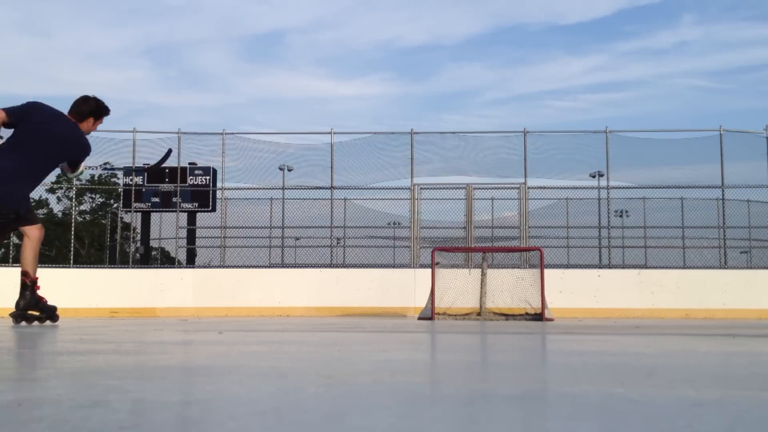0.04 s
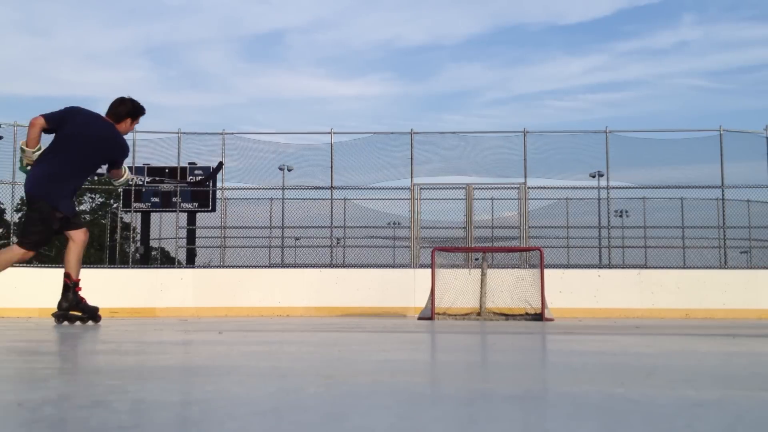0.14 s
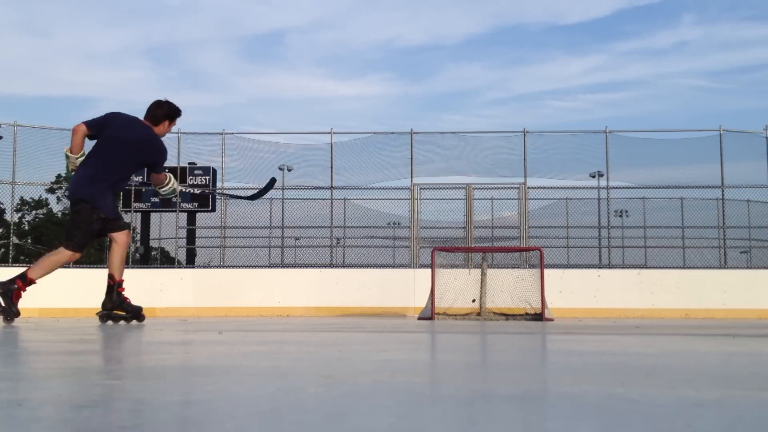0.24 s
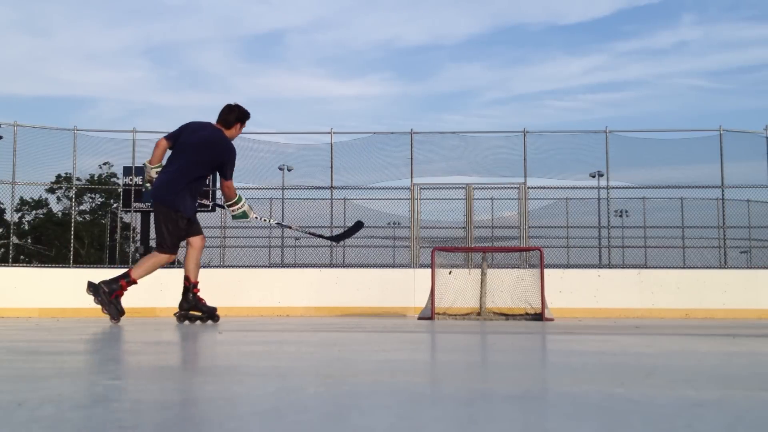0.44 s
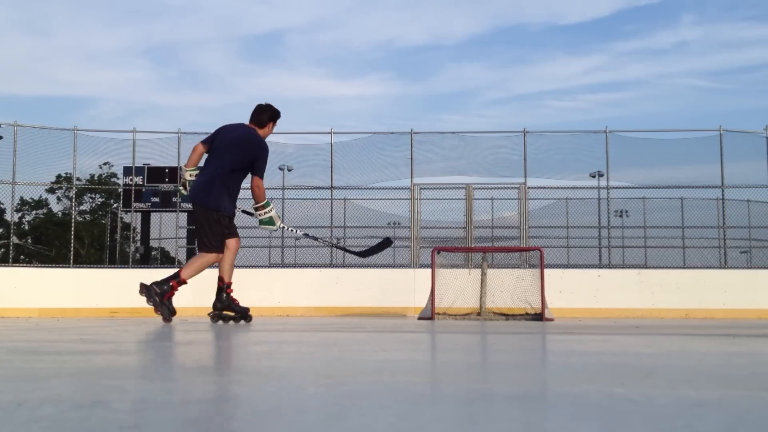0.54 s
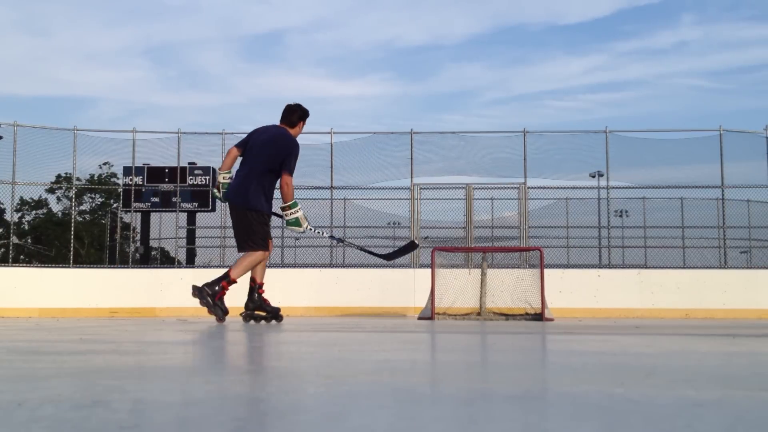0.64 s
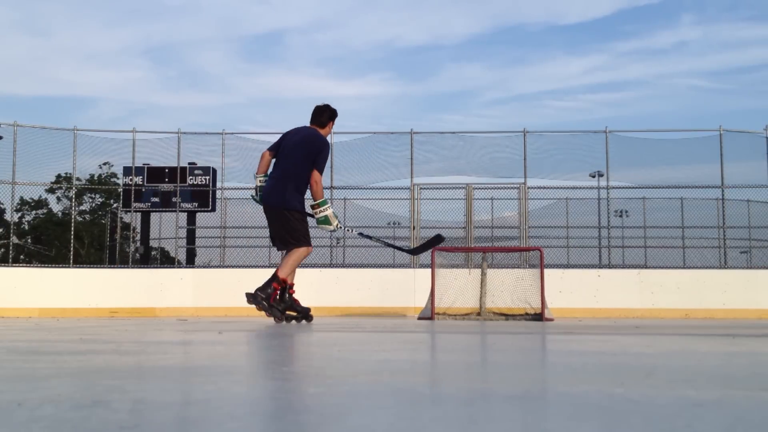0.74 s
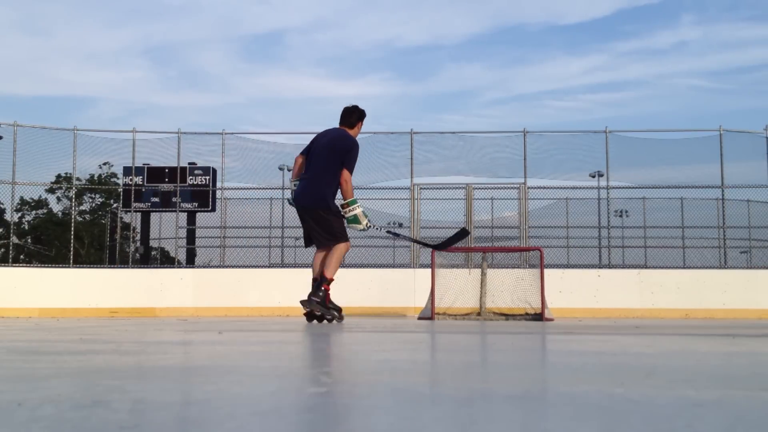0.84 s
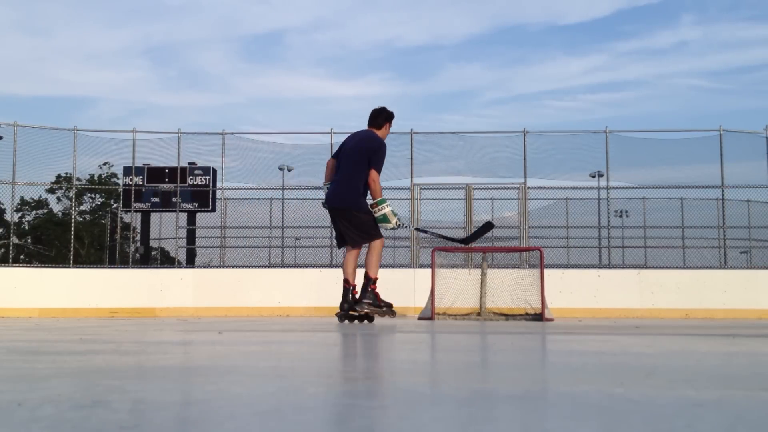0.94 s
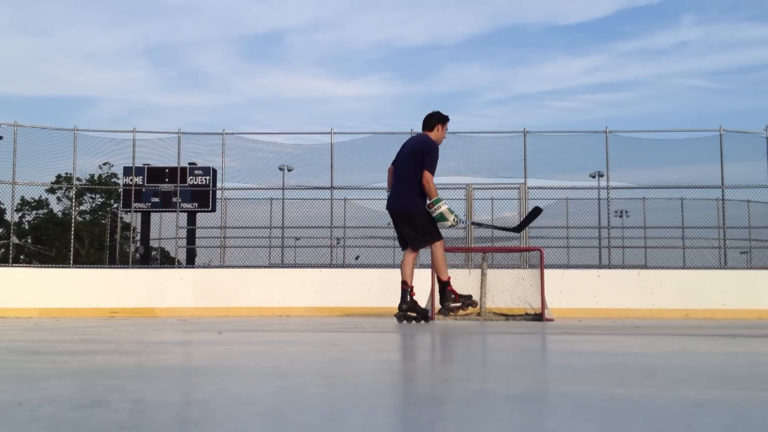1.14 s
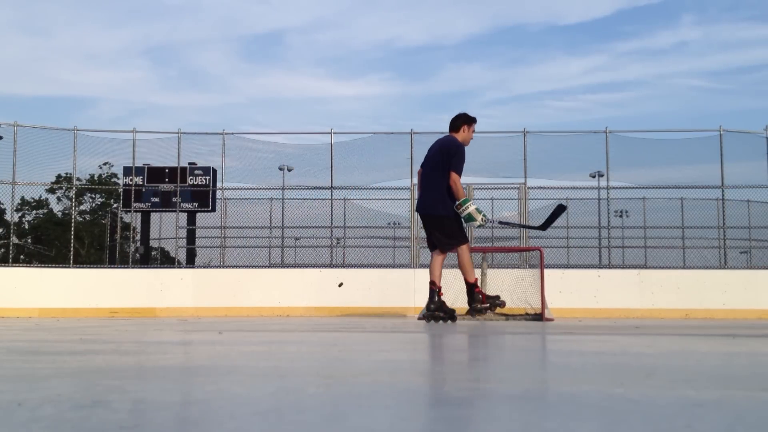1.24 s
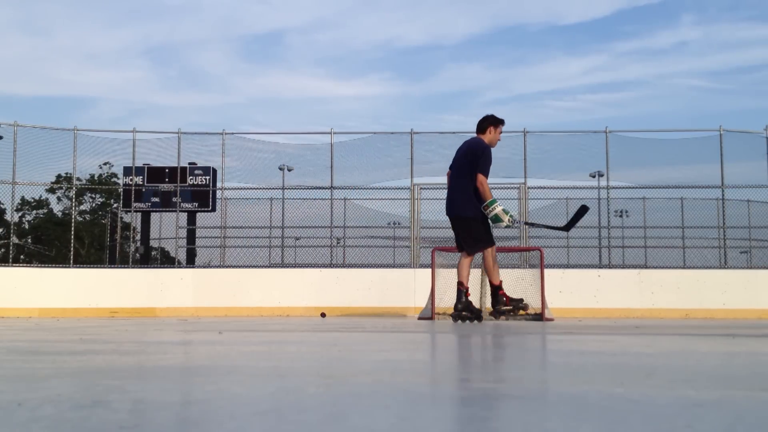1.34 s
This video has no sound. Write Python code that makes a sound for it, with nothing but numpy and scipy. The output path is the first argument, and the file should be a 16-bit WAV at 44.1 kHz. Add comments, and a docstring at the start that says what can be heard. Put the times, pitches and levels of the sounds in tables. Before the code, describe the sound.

A hockey puck strikes a steel goal post at about 0.25 seconds with a sharp crack and a loud, ringing clang. Quick slaps and rattles follow until 0.5 seconds, and a dull echo spreads around the outdoor rink, dying away by about 1.3 seconds. Underneath, inline skates roll and click quietly from the start, fading after 0.6 seconds over a faint outdoor rumble.

```python
"""A hockey puck cracks against the steel post of a goal on an outdoor rink, and the tubular frame clangs.
The nearby boards throw the clang back at once; fences and far walls return it as a dull, long echo.
The shooter's inline skates roll and tick on the hard floor, fading over a faint outdoor rumble.
One small microphone picks it all up, and the recorder's compressor holds down the clang."""
import sys
import numpy as np
from scipy import signal
from scipy.fft import rfft, irfft
from scipy.io import wavfile
from scipy.ndimage import uniform_filter1d, minimum_filter1d

SR = 44100
rng = np.random.default_rng(int(sys.argv[2]) if len(sys.argv) > 2 else 0)


def transcribe(signal):
    """Save signal, clipped to [-1, 1], as a 16-bit WAV file at the path in sys.argv[1]."""
    frames = np.atleast_2d(signal).T
    limited = np.clip(frames, -1, 1)
    pcm = np.round(limited * 32767).astype(np.int16)
    wavfile.write(sys.argv[1], SR, pcm)


N = 61739
TIME = np.arange(N) / SR
HIT_S = 0.2463   # the puck meets the post

# modes of the steel frame: pitch_hz
FRAME_PITCHES = [902.5, 949, 1121, 1147, 1250, 1486, 1594, 1805.5, 1922, 2003.3, 2188, 2259, 2310, 2552,
                 2633, 2773, 3102, 3145, 3306, 3878, 5846, 6433, 7257]
# the same modes, row for row: direct_db, direct_t60_s, off_boards_db, far_echo_db
FRAME_MODES = [(-37, 1, -20.5, -48.5), (-23.5, 0.47, -24, -41), (-28.5, 0.73, -33.5, -50),
               (-28, 0.65, -40.5, -41.5), (-35, 0.59, -30.5, -44.5), (-23.5, 0.78, -20, -39.5),
               (-35, .4, -33, -54.5), (-16.5, 0.67, -38, -38), (-19, 0.55, -19.5, -45),
               (-29.5, 0.36, -22, -42.5), (-36.5, 0.39, -27.5, -43.5), (-27, 1.0, -34, -40.5),
               (-37, 0.95, -31.5, -46.5), (-29.5, 0.35, -26.5, -45), (-20, 0.35, -26.5, -43),
               (-33.5, 0.29, -36, -52.5), (-22.5, .4, -47, -53), (-25.5, 0.34, -28, -52.5),
               (-27, 0.38, -32.5, -53.5), (-29.5, 0.53, -39, -58.5), (-31, 0.28, -41.5, -72),
               (-29.5, .3, -43.5, -68), (-47, .25, -51, -77)]


def from_db(db):
    """Decibels to gain."""
    return 10 ** (np.asarray(db) / 20)


def rms_one(x):
    """Scale to rms 1."""
    return x / np.sqrt(np.mean(np.abs(x) ** 2) + 1e-20)


def drift(rate_hz):
    """A smooth random wander with a spread of about 1."""
    step, settle = 40, 2000   # samples per point, points dropped while the filter settles
    pole = np.exp(-2 * np.pi * rate_hz * step / SR)
    white = rng.standard_normal(N // step + settle + 2)
    slow = signal.lfilter([1], [1, -2 * pole, pole * pole], white)[settle:]
    return np.interp(np.arange(N) / step, np.arange(len(slow)), rms_one(slow))


def coloured(x, colour):
    """Causal (minimum-phase) filter with the given colour; white noise keeps its level."""
    hz, db = np.transpose(colour)
    size = 4096
    bins_hz = np.maximum(np.arange(size // 2 + 1) * SR / size, 1)
    gain = rms_one(from_db(np.interp(np.log(bins_hz), np.log(hz), db)))
    cepstrum = irfft(np.log(gain))
    cepstrum[1:size // 2] *= 2
    cepstrum[size // 2 + 1:] = 0
    impulse = irfft(np.exp(rfft(cepstrum)))
    return signal.fftconvolve(x, impulse)[:len(x)]


def noise(colour, flicker_db=0):
    """Coloured noise at rms 1, with an optional fast flicker of level."""
    flicker = np.pad(from_db(flicker_db * drift(rate_hz=130)), (SR // 10, 0), mode="edge")
    return rms_one(coloured(rng.standard_normal(len(flicker)) * flicker, colour)[-N:])


def swell(start_s, level_db, rise_s, t60_s):
    """A straight rise, then an exponential decay."""
    age = TIME - start_s
    return from_db(level_db - 60 * np.maximum(age - rise_s, 0) / t60_s) * np.clip(age / rise_s, 0, 1)


def arrivals(rows):
    """Envelope of several swells whose powers add."""
    return np.sqrt(sum(swell(*row) ** 2 for row in rows))


def bursts(rows, colour, t60_s, rise_s=0.0004):
    """Short noisy contacts that share one colour and decay."""
    envelope = arrivals([(start_s, db, rise_s, t60_s) for start_s, db in rows])
    return coloured(rng.standard_normal(N) * envelope, colour)


def struck(pitch_hz, level_db, t60_s, start_s=HIT_S, rise_s=0.00068):
    """One mode set ringing by a blow."""
    return swell(start_s, level_db, rise_s, t60_s) * np.sin(2 * np.pi * pitch_hz * (TIME - start_s))


def scattered(pitch_hz, share):
    """A tone that comes by many paths, so that a share of its power wavers in level and phase."""
    waver = (drift(rate_hz=13.9) + 1j * drift(rate_hz=13.9)) / np.sqrt(2)
    amplitude = np.sqrt(1 - share) + np.sqrt(share) * waver
    return np.real(amplitude * np.exp(2j * np.pi * pitch_hz * (TIME - HIT_S)))


def puck():
    """At the post: the hard crack, the bright sizzle of the steel and the puck's own dull knock."""
    # a graze, the blow, its quick return off the floor: start_s, level_db
    contacts = [(.2451, -11), (0.2466, 9), (.2468, 2.5)]
    # colour of the crack: frequency_hz, relative_db
    crack_colour = [(60, -46), (150, -4), (300, -1.5), (700, 6.5), (2200, 0), (3500, -3.5), (6500, -5),
                    (8000, -28), (10000, -26.5), (15500, -40)]
    # colour of the sizzling steel: frequency_hz, relative_db
    sizzle_colour = [(1500, -34), (3200, 0), (4200, 8), (5200, -11.5), (6400, -0.5), (7500, -15),
                     (8600, -9), (9600, -34), (12200, -25), (15500, -34.5)]
    # modes of the puck: pitch_hz, level_db, t60_s
    knock_modes = [(227.5, -34.5, 0.081), (356, -31.5, 0.027), (537, -22, 0.016), (735, -22, 0.0089)]
    clicks = np.zeros(N)
    for start_s, db in contacts:
        clicks[int(start_s * SR)] += from_db(db)
    sizzle = noise(sizzle_colour, flicker_db=1) * swell(HIT_S, level_db=-26, rise_s=0.00058, t60_s=0.36)
    knock = sum(struck(*mode) for mode in knock_modes)
    return coloured(clicks, crack_colour) + sizzle + knock


def goal():
    """The frame's ring and dense clatter, straight to the microphone and off the nearby boards."""
    # the ring as the boards return it: start_s, gain_db, rise_s, t60_s
    ring_returns = [(.272, 4.5, 0.04, 0.25), (.41, -24, 0.013, 0.94)]
    # clatter of frame, net and boards: frequency_hz, relative_db
    clatter_colour = [(60, -61), (110, -31), (180, -21.5), (350, -13), (600, -6.5), (1000, -0.5),
                      (1600, -1), (2300, 2), (2950, -5.5), (3250, -3.5), (3600, -11), (4100, -7.5),
                      (5200, -25.5), (6400, -16), (8200, -28.5), (9800, -54.5), (12000, -42.5),
                      (15500, -59.5)]
    # the clatter arriving direct, then off the boards: start_s, gain_db, rise_s, t60_s
    clatter_arrivals = [(.2478, 1, 0.0016, 0.39), (.283, 1.5, 0.016, 0.38)]
    direct, returned = np.zeros((2, N))
    for hz, (direct_db, t60_s, boards_db, _) in zip(FRAME_PITCHES, FRAME_MODES):
        direct += struck(hz, direct_db, t60_s)
        returned += from_db(boards_db) * scattered(hz, share=0.19)
    clatter = from_db(-15) * noise(clatter_colour)
    return direct + returned * arrivals(ring_returns) + clatter * arrivals(clatter_arrivals)


def slaps():
    """Hard slaps off the floor and boards, and rattles of the goal, just after the hit."""
    # slaps and rattles: start_s, level_db
    hits = [(.2712, -16), (.2752, -15.5), (.2843, -24), (.325, -51), (.356, -21.5), (.4235, -30),
            (.4645, -40)]
    # their colour: frequency_hz, relative_db
    slap_colour = [(80, -48.5), (200, -9), (600, 5), (2000, 10), (4500, -1.5), (7500, -8.5), (10000, -25.5),
                   (15500, -44)]
    return bursts(hits, slap_colour, t60_s=0.029)


def far_echo():
    """From a distance, all around the rink, the clang comes back smeared and dulled."""
    # echoes from fences and far walls: start_s, gain_db, rise_s, t60_s
    wall_returns = [(.38, 3, 0.061, 1.34), (.55, -2.5, 0.1, 0.63), (.89, -15.5, 0.049, 1.14)]
    # colour of their noisy wash: frequency_hz, relative_db
    wash_colour = [(60, -57), (150, -33.5), (350, -16.5), (550, -8), (1000, -1.5), (1500, -4), (2300, 0),
                   (3100, -13), (4100, -17), (5200, -31), (6500, -25.5), (8200, -49), (10000, -54),
                   (15500, -56)]
    ring = sum(from_db(echo_db) * scattered(hz, share=0.84)
               for hz, (_, _, _, echo_db) in zip(FRAME_PITCHES, FRAME_MODES))
    wash = from_db(-37) * noise(wash_colour)
    return (ring + wash) * arrivals(wall_returns)


def skates():
    """Wheels roll on the hard floor, skates and stick click, and one skate lands with a dull clunk."""
    # loudness of the rolling wheels: time_s, level_db
    roll_levels = [(0, -44), (.03, -42), (.052, -46.5), (.066, -44.5), (.105, -42), (.128, -45),
                   (.18, -44.5), (.23, -45), (.6, -47.5), (1.0, -55.5), (1.25, -59.5), (1.4, -60.5)]
    # wheels on the floor: frequency_hz, relative_db
    wheel_colour = [(80, -50), (300, -13), (700, -4), (1300, 1), (2100, 0.5), (3000, -5.5), (4400, -9.5),
                    (5300, -17), (8200, -23), (9800, -38.5), (15500, -44)]
    # clicks of skates and stick, and one late rattle of the goal at 0.715 s: start_s, level_db
    ticks = [(.001, -42.5), (.024, -48), (.0585, -37), (.063, -53), (.1145, -36), (.174, -56), (.715, -42),
             (1.1708, -53), (1.2182, -53.5), (1.309, -48), (1.3314, -52)]
    # their colour: frequency_hz, relative_db
    tick_colour = [(80, -34), (300, 0), (700, -3.5), (1700, 3.5), (4000, -6.5), (8000, -15.5), (10000, -27),
                   (15500, -43)]
    roll = from_db(np.interp(TIME, *np.transpose(roll_levels))) * noise(wheel_colour, flicker_db=1.5)
    clunk = struck(pitch_hz=331, level_db=-42.5, t60_s=0.03, start_s=0.5, rise_s=0.0032)
    return roll + bursts(ticks, tick_colour, t60_s=0.022) + clunk


def open_air():
    """Outdoor air and far traffic: a faint rumble that slowly grows."""
    # loudness of the rumble: time_s, level_db
    air_levels = [(0, -62), (.8, -59), (1.3, -54.5)]
    # its colour: frequency_hz, relative_db
    air_colour = [(30, -13), (70, -14), (130, 1.5), (190, 0.5), (300, -4.5), (500, -5), (950, 0.5),
                  (1500, -5), (2600, -15), (5000, -23.5), (8000, -20.5), (9500, -41), (15000, -29.5)]
    return from_db(np.interp(TIME, *np.transpose(air_levels))) * noise(air_colour)


def scene():
    """Shot, echoes, skater and open air at one microphone."""
    return (puck() + goal() + slaps() + far_echo() + skates() + open_air())[None]


def record(dry):
    """The small microphone loses deep bass; compressor and limiter hold the clang; the top is cut."""
    low_cut_hz, high_cut_hz = 115, 15600
    threshold_db, squeeze, sense_s = -13.5, 0.41, 0.0073   # squeeze: dB lost per dB over the threshold
    ceiling, limiter_samples = 0.85, int(0.0015 * SR)
    thin = signal.sosfilt(signal.butter(3, low_cut_hz, "high", fs=SR, output="sos"), dry)
    pole = np.exp(-1 / (sense_s * SR))
    level_db = 10 * np.log10(signal.lfilter([1 - pole], [1, -pole], thin ** 2) + 1e-12)
    compressed = thin * from_db(-squeeze * np.maximum(level_db - threshold_db, 0))
    peak_gain = ceiling / np.maximum(np.abs(compressed), ceiling)
    smooth_gain = uniform_filter1d(minimum_filter1d(peak_gain, limiter_samples), limiter_samples)
    high_cut = signal.ellip(10, .1, 80, high_cut_hz, fs=SR, output="sos")
    return signal.sosfilt(high_cut, compressed * smooth_gain)


dry = scene()
out = record(dry)
transcribe(out)
```